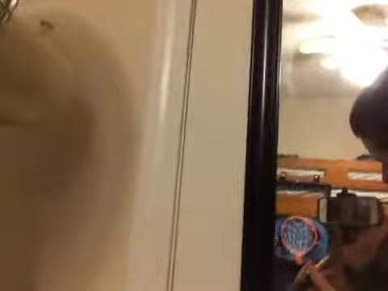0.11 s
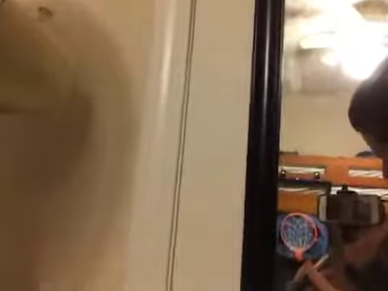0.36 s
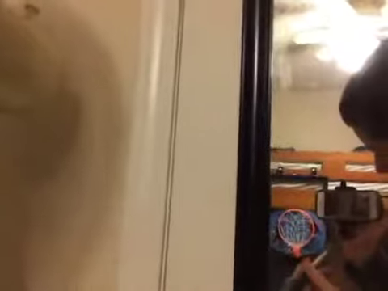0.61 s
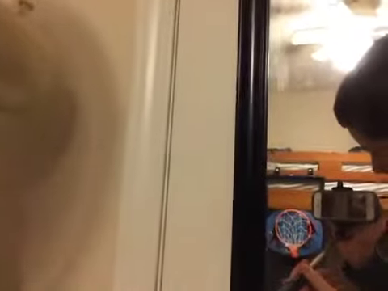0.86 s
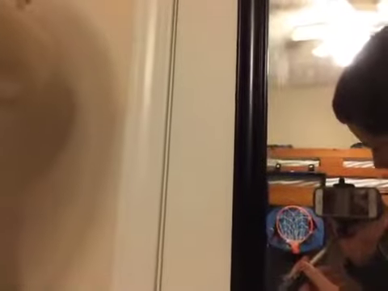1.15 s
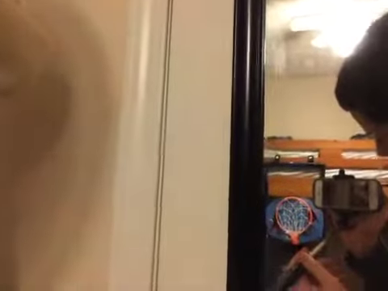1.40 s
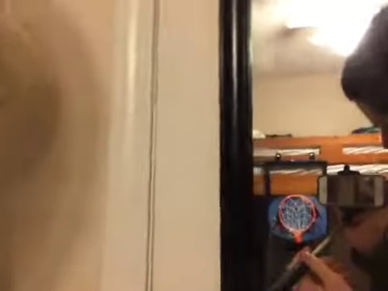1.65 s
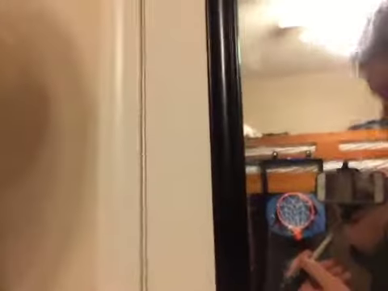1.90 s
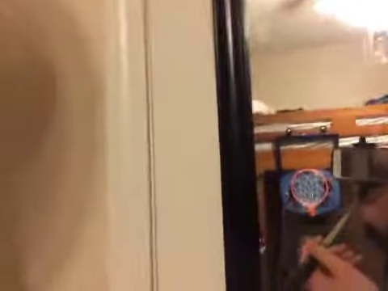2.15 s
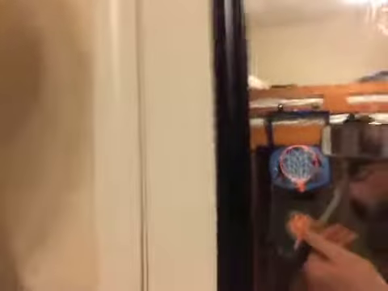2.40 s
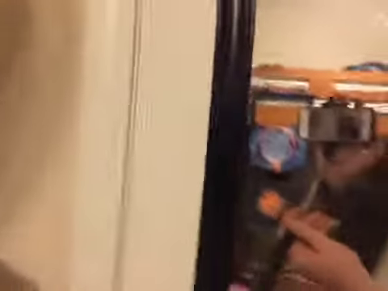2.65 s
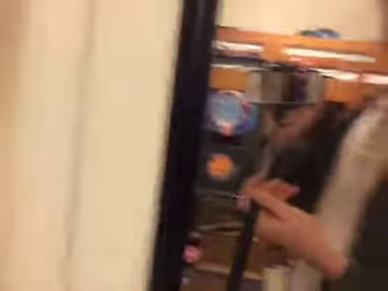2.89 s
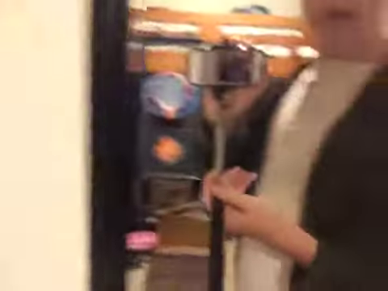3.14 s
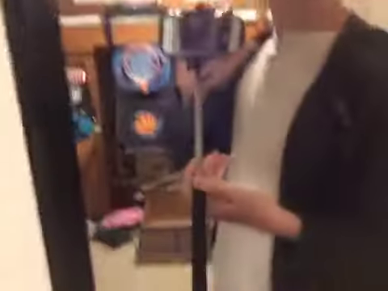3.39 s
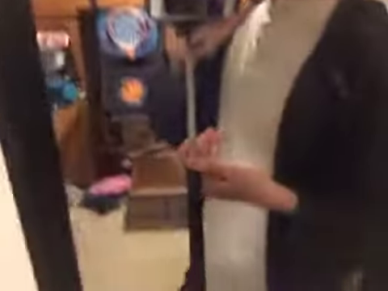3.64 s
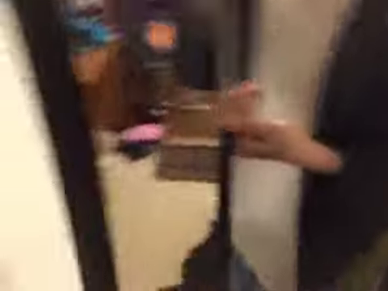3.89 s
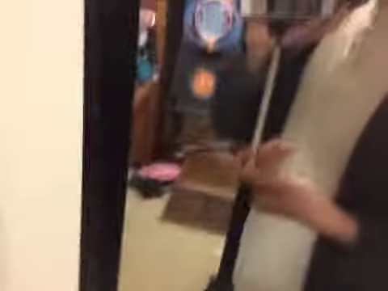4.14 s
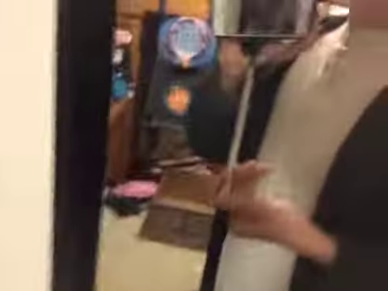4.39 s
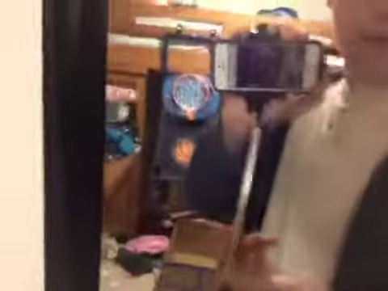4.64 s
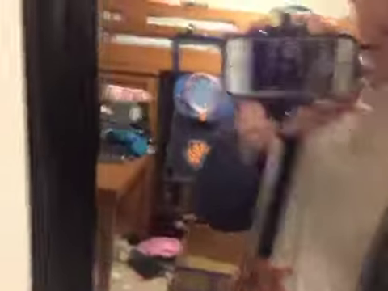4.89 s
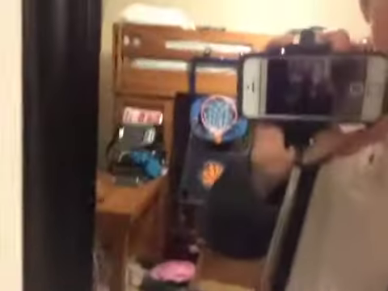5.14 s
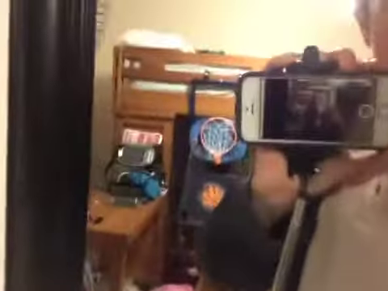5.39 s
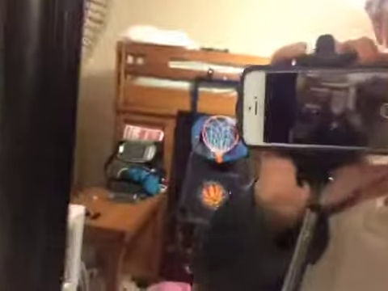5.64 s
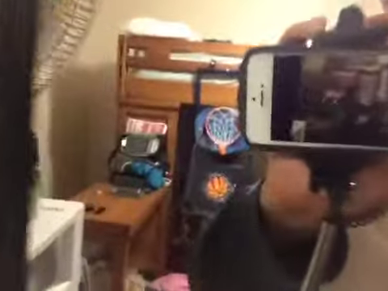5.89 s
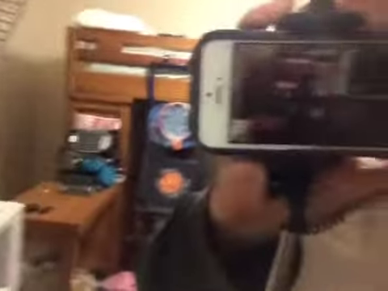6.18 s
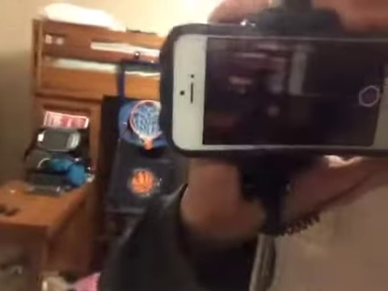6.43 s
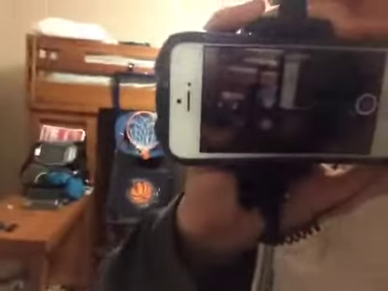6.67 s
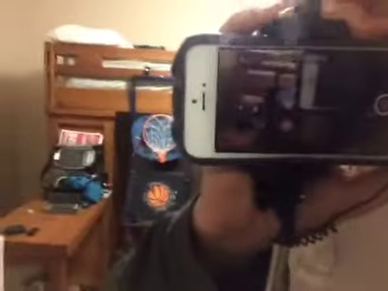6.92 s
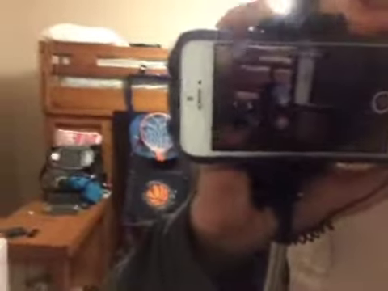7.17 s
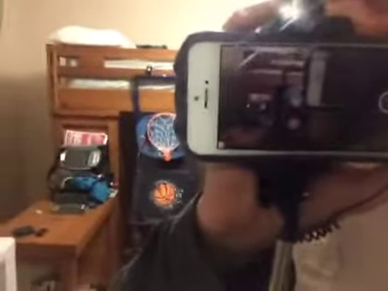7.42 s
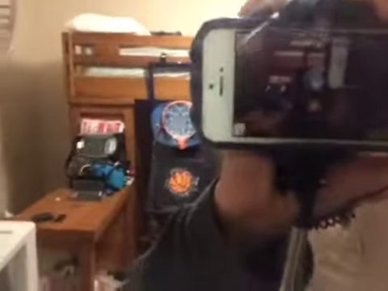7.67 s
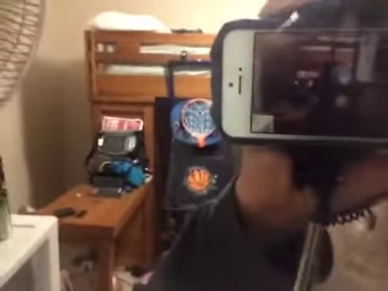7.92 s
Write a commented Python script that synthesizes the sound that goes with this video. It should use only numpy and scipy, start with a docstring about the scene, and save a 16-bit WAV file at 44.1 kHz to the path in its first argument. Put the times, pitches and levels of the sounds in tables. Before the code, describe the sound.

A large three-bladed electric fan is already running in a small furnished bedroom and keeps a constant speed for all eight seconds. From 0 to about 2 s a deep blade drone near 67 Hz dominates, with a wavering higher hum around 200 Hz, weak motor hum and a broad, mostly low-to-mid rush of air. Between 1.5 and 3 s the phone swings away from a door and the drone sinks markedly; the rush swells slightly around 3 s, its tone shifting. At 3.5 s the stick's clamp gives a small, dry, bright tick, with much fainter scrapes near 3.7 and 3.8 s. Soft low bumps follow at 3.8 and 4.1 s, with subsonic draught flutter around 4 to 5.5 s. The rush is lowest near 5 to 6 s, then becomes fuller and more hollow beside a mirror after 6.2 s. A weak draught returns at 7.5 s; the fan continues to the end.

```python
"""A low blade hum and a rush of air: a three-bladed fan in a bedroom, heard by a phone on a stick.
The phone swings away from a door: the hum sinks, the rush rises and falls, the stick ticks and bumps.
Blades sound on multiples of the shaft speed; motor hum near multiples of 120 Hz joins other steady tones.
Rush and draught are shaped noise; ticks are ringing modes struck by noise, bumps short low pulses."""
import sys
import numpy as np
from scipy import signal
from scipy.fft import rfft, irfft, next_fast_len
from scipy.io import wavfile

SR = 44100
rng = np.random.default_rng(int(sys.argv[2]) if len(sys.argv) > 2 else 0)


def natural_amplitude(level_db):
    """Convert a level in decibels to a linear amplitude factor, elementwise."""
    exponent = np.asarray(level_db, float) / 20
    return 10 ** exponent


def persist_wave(psi):
    """Save psi, clipped to +-1, as 16-bit WAV."""
    counts = np.round(np.clip(psi, -1, 1) * 32767).astype(np.int16)
    wavfile.write(sys.argv[1], SR, np.atleast_2d(counts).T)


N = 354563
T = np.arange(N) / SR

# standing waves along the path, strongest by the door: (t/s, blade tone level/dB, its third harmonic level/dB)
HUM_PATH = [(0, -25, -39.5), (1.0, -25.5, -39), (1.2, -24.5, -41.5), (1.75, -27, -41.5),
            (2.1, -30.5, -40.5), (2.85, -30, -44), (3.05, -35, -40.5), (3.35, -33, -39.5),
            (4.0, -35, -47.5), (4.5, -36.5, -42), (5.1, -34.5, -50.5), (5.4, -35, -38.5),
            (6.5, -33.5, -41.5), (6.7, -34.5, -43.5), (7.35, -33, -39), (8.04, -34, -47)]
# brief dropouts of the third harmonic: (t/s, level/dB)
HARMONIC_DIPS = [(.15, -8.5), (.54, -12), (.85, -4), (1.52, -2.5), (1.99, -18), (2.15, -19), (2.37, -12.5),
                 (2.94, -2), (3.13, -13), (3.31, -4), (3.63, -18), (4.05, -7), (4.66, -11), (4.93, -5),
                 (5.17, -12), (7.63, -3)]
# shaft multiples that vary with place: (multiple, start level/dB, middle level/dB, end level/dB,
# turbulent share [0-1])
UPPER_HUM_ORDERS = [(6, -47.5, -56, -48, 0.53), (15, -46.5, -54, -48, 0.86), (17, -51.5, -55, -50.5, 0.43),
                    (21, -48, -57, -48.5, 0.48)]
# other shaft multiples: (multiple before rounding, start level/dB, end level/dB, turbulent share [0-1])
OTHER_ORDERS = [(1, -42, -44, 0.07), (2, -59, -74, 0.1), (4, -59.5, -60.5, 0.4), (12, -53, -56, 0.71),
                (18.1, -61.5, -57.5, 0.77), (24, -70, -65.5, 1), (26.7, -69, -76, 0), (30, -95, -62.5, 1)]


def blades():
    """Three blades favour multiples of three shaft turns; eddies sucked in blur the upper ones."""
    shaft_hz, waver_rms_hz, dip_half_s = 22.45, .03, .031
    turns = np.cumsum(shaft_hz + waver_rms_hz * walk(.15)) / SR
    out = tone(3 * turns, column(HUM_PATH, 1), rough=.05, width_hz=3.0)

    dips_db = sum(db * np.exp(-((T - s) / dip_half_s) ** 2) for s, db in HARMONIC_DIPS)
    out = out + tone(9 * turns, column(HUM_PATH, 2) + dips_db, rough=.25, width_hz=5.0)

    for k, start_db, middle_db, end_db, rough in UPPER_HUM_ORDERS:
        level_db = np.interp(T, [0, T[-1] / 2, T[-1]], [start_db, middle_db, end_db])
        out = out + tone(round(k) * turns, level_db, rough, width_hz=4.5)
    for k, start_db, end_db, rough in OTHER_ORDERS:
        level_db = start_db + (end_db - start_db) * T / T[-1]
        out = out + tone(round(k) * turns, level_db, rough, width_hz=2.0 + .09 * k)
    return out


# phone path: (t/s, distance level/dB before the band share, facing the fan [0-1],
# echo delay [ms], echo share [0-1])
PHONE_PATH = [(0, 1, 1, 0.41, 0), (.6, 1.5, .7, .54, 0), (1.2, 3, 0.2, 0.46, 0.1),
              (2, 2.5, 0.27, 0.82, 0.02), (2.6, 3, 0, 0.85, 0), (3.1, 3.5, 0.7, 1.23, 0.1),
              (3.6, 0.5, 0.4, 0.95, 0.07), (4.4, -0.5, .2, 1.08, 0.13), (5, -3, 0.38, 1.25, 0.09),
              (5.7, -3, 0.57, 1.14, 0.02), (6.2, -2.5, .2, 0.83, 0.14), (6.8, -0.5, 0.4, 0.78, 0.05),
              (7.4, -0.5, 0.17, 0.38, 0), (8.04, -2, 0.1, 0.56, 0)]
# share of the distance level that each band follows: (f/Hz, share)
DISTANCE_SHARE_BY_HZ = [(250, 0.5), (420, 0.6), (620, 0.47), (900, 0.8), (1800, 1.24), (4000, .5),
                        (9000, .4)]
# gain at full facing: (f/Hz, level/dB)
FACING_GAIN = [(1500, -1), (2200, 0), (3200, 4), (5500, 6), (9000, 0.5)]
# colour by the door: (f/Hz, level/dB)
DOOR_COLOUR = [(300, 0.5), (420, 1.5), (620, 4), (850, 2), (2000, -1), (5000, 1), (10000, 2.5)]
# colour by the mirror: (f/Hz, level/dB)
MIRROR_COLOUR = [(100, -2), (140, -0.5), (350, 5.5), (600, 1), (1000, -3), (1500, 1.5), (3000, 1)]
# narrow swells as the phone passes: (t/s, f/Hz, peak level/dB, half length [s])
BAND_SWELLS = [(2.3, 617, 4.5, 0.81), (3.4, 350, 6, 0.59), (3.5, 905, 4, 0.55), (6.15, 1190, 5, 0.22),
               (7.7, 1150, 3.5, 0.44)]


def rush_band_db(centre_hz):
    """Level of one rush band at the moving phone: distance, facing, large surfaces close by, swells."""
    leave_door_s, reach_mirror_s, move_s = 2.14, 6.24, .086
    swell_half_octaves = .16
    door = 1 / (1 + np.exp((T - leave_door_s) / move_s))
    mirror = 1 / (1 + np.exp((reach_mirror_s - T) / move_s))
    db = over_hz(DISTANCE_SHARE_BY_HZ, centre_hz) * column(PHONE_PATH, 1)
    db = db + over_hz(FACING_GAIN, centre_hz) * column(PHONE_PATH, 2)
    db = db + over_hz(DOOR_COLOUR, centre_hz) * door
    db = db + over_hz(MIRROR_COLOUR, centre_hz) * mirror
    for s, hz, peak_db, half_s in BAND_SWELLS:
        off_band = np.log2(centre_hz / hz) / swell_half_octaves
        db = db + peak_db * np.exp(-off_band ** 2 - ((T - s) / half_s) ** 2)
    return db


def surface_echo(direct):
    """The nearest surface returns a delayed copy; soft surfaces return less treble."""
    delay_samples = column(PHONE_PATH, 3) * SR / 1000
    echo = np.interp(np.arange(N) - delay_samples, np.arange(N), direct)
    echo = signal.lfilter(*signal.butter(1, 3500, fs=SR), echo)
    return column(PHONE_PATH, 4) * echo


# rush spectrum, relative: (f/Hz, level/dB per Hz)
AIR_SPECTRUM = [(30, -10.5), (60, -5.5), (105, -12.5), (150, -13), (200, -12), (500, -17.5), (1000, -14),
                (1400, -19), (1800, -23.5), (2200, -30), (3500, -39.5), (6500, -46), (8000, -49.5),
                (10500, -52), (14000, -53.5), (16000, -56)]


def rush():
    """Air over blades and guard: noise in third-octave bands, each wandering a little on its own."""
    rush_rms_db, room_db, wander_rms_db = -42, -18, 1.0
    direct = 0
    for centre_hz in 20 * 2 ** np.arange(0, 9.7, 1 / 3):
        def shape(hz):
            # overlapping cosine windows keep the summed power smooth
            window = np.cos(np.pi / 2 * np.clip(3 * np.log2(hz / centre_hz), -1, 1))
            return window * natural_amplitude(over_hz(AIR_SPECTRUM, hz))

        level_db = rush_band_db(centre_hz) + wander_rms_db * walk(.28)
        direct = direct + band(1, SR / 2, shape) * natural_amplitude(level_db)
    out = direct + surface_echo(direct)
    out = out + natural_amplitude(room_db) * room(direct)
    return out * natural_amplitude(rush_rms_db) / out.std()


# motor hum near multiples of 120 Hz, and other steady tones: (f/Hz, start level/dB, end level/dB)
STEADY_TONES = [(18.08, -47, -46), (36.84, -62, -62), (120.03, -49, -55), (178.07, -60, -60),
                (240.06, -58, -57), (254.95, -62, -62), (329.9, -63, -63), (360.01, -60, -58),
                (600, -67, -67)]


def steady_tones():
    """Nearly steady low tones: motor hum near multiples of 120 Hz, and other steady tones."""
    out = 0
    for hz, start_db, end_db in STEADY_TONES:
        level_db = start_db + (end_db - start_db) * T / T[-1]
        out = out + tone(hz * T, level_db, rough=.2, width_hz=.6)
    return out


# ringing of the clamp: (f/Hz, relative level/dB, t60 [s])
CLAMP_MODES = [(6500, 0, .012), (6850, -13, .025), (6150, -14, .015), (3700, -6, .009), (4800, -20, .004)]
# clamp contacts: (t/s, peak level/dB of the first hit, scrape length [s])
CLAMP_TICKS = [(3.4915, -38, .00005), (3.682, -52, .010), (3.775, -49, .009)]


def ticks():
    """The stick's clamp ticks or scrapes briefly, rings in its modes and bounces twice."""
    out = np.zeros(N)
    t = np.arange(int(.06 * SR)) / SR
    ring = 0
    for hz, db, t60_s in CLAMP_MODES:
        ring = ring + natural_amplitude(db) * np.sin(2 * np.pi * hz * t) * np.exp(-np.log(1000) * t / t60_s)
    ring = ring * np.minimum(t / .0007, 1) ** 2  # the contact takes a moment
    for s, peak_db, scrape_s in CLAMP_TICKS:
        grit = rng.standard_normal(len(t)) ** 3
        hit = np.convolve(grit * (t < scrape_s), ring)
        hit = hit / np.abs(hit).max()
        for lag_s, bounce_db in ((0, 0), (.0037, -9), (.011, -14)):
            i = int((s + lag_s) * SR)
            out[i:i + len(hit)] += natural_amplitude(peak_db + bounce_db) * hit
    return out


# soft bumps: (t/s, envelope peak level/dB, f/Hz)
SOFT_BUMPS = [(3.816, -28, 30), (4.125, -31, 22)]


def bumps():
    """Soft bumps shake the phone: low cosines under short bell envelopes."""
    out = np.zeros(N)
    for s, db, hz in SOFT_BUMPS:
        envelope = np.exp(-((T - s) * hz / .5) ** 2)
        out += natural_amplitude(db) * np.cos(2 * np.pi * hz * (T - s) + .6) * envelope
    return out


# gusts on top of the steady draught: (t/s, peak rms level/dB, half width [s])
DRAUGHT_GUSTS = [(4, -40, .25), (4.75, -37, .2), (5.5, -42, .25), (7.5, -43, .25)]


def draught():
    """Slow pressure swings where moving air meets the microphone, stronger in gusts."""
    steady_rms_db = -53.5
    swing = band(.5, 200, lambda hz: (hz / 3) / (1 + (hz / 7) ** 4))
    gusts = sum(natural_amplitude(db) * np.exp(-((T - s) / half_s) ** 2) for s, db, half_s in DRAUGHT_GUSTS)
    return swing / swing.std() * (natural_amplitude(steady_rms_db) + gusts)


def room(x):
    """Walls answer with a decaying tail; its pattern changes as the phone moves on."""
    t60_s = .2
    t = np.arange(SR // 3) / SR
    lead_in = x[::-1][-len(t):]  # mirrored start, so the room already sounds at t = 0
    out = 0
    for spot_s in np.linspace(0, T[-1], num=9):
        tail = rng.standard_normal(len(t)) * np.exp(-np.log(1000) * t / t60_s)
        tail = signal.lfilter(*signal.butter(1, 5000, fs=SR), tail)  # bedding swallows the treble
        tail = tail / np.sqrt(np.sum(tail ** 2))
        here = np.cos(np.pi / 2 * np.clip((T - spot_s) / (T[-1] / 8), -1, 1))
        wet = signal.oaconvolve(np.r_[lead_in, x], tail)[len(t):len(t) + N]
        out = out + here * wet
    return out


def tone(turns, db, rough, width_hz):
    """A sine of given rms, part steady, part smeared into a narrow hump by slow random modulation."""
    rough = np.clip(rough, 0, 1)
    smear = (walk(width_hz) + 1j * walk(width_hz)) / np.sqrt(2)
    start = np.exp(2j * np.pi * rng.random())
    carrier = start * np.exp(2j * np.pi * turns)
    return np.sqrt(2) * natural_amplitude(db) * np.real((np.sqrt(1 - rough ** 2) + rough * smear) * carrier)


def walk(rate_hz):
    """Slow chance with spread 1, rolling off above the given rate."""
    step = 64  # samples
    pole = np.exp(-2 * np.pi * rate_hz * step / SR)
    chance = rng.standard_normal(N // step + 2000)
    slow = signal.lfilter([np.sqrt(1 - pole ** 2)], [1, -pole], chance)[1998:]  # settled part
    return np.interp(np.arange(N) / step, np.arange(len(slow)), slow)


def band(lo_hz, hi_hz, gain):
    """Noise shaped by a gain over frequency, held constant outside lo_hz..hi_hz."""
    size = next_fast_len(N)
    hz = np.clip(np.arange(size // 2 + 1) * SR / size, lo_hz, hi_hz)
    return irfft(rfft(rng.standard_normal(size)) * gain(hz), size)[:N]


def column(table, k):
    """Column k of a table in time, interpolated at every sample."""
    return np.interp(T, [r[0] for r in table], [r[k] for r in table])


def over_hz(table, hz):
    """A table over frequency, read on a log axis."""
    return np.interp(np.log(hz), np.log([r[0] for r in table]), [r[1] for r in table])


def scene():
    """Everything summed at the one microphone."""
    return (blades() + rush() + steady_tones() + ticks() + bumps() + draught())[None]


def roll_off(x):
    """The treble ends steeply here."""
    return signal.sosfilt(signal.butter(12, 15160, fs=SR, output="sos"), x)


def record(dry):
    """The phone cuts the top with a steep elliptic low-pass."""
    top_hz, ripple_db, stop_db = 15250, .2, 60
    low_pass = signal.ellip(10, ripple_db, stop_db, top_hz, fs=SR, output="sos")
    mix = signal.sosfilt(low_pass, dry)
    return roll_off(mix)


dry = scene()
out = record(dry)
persist_wave(out)
```